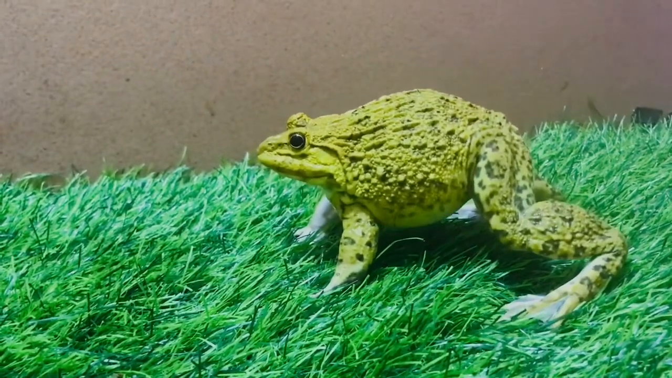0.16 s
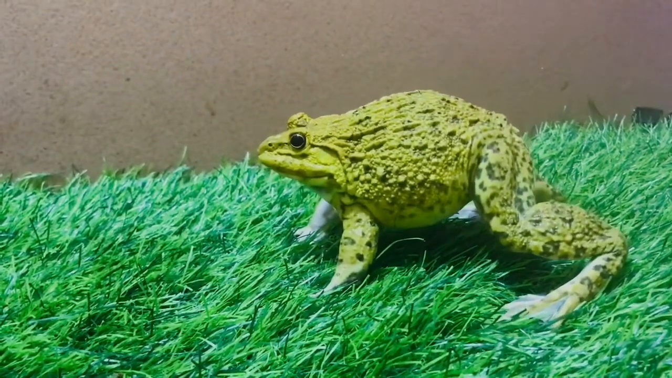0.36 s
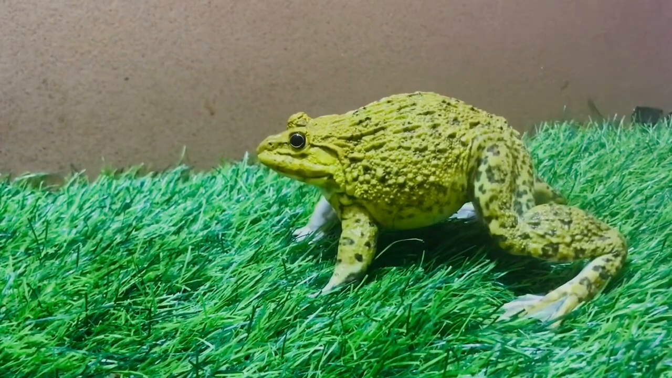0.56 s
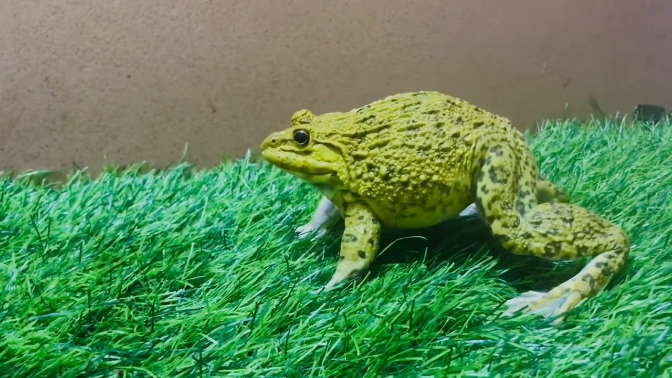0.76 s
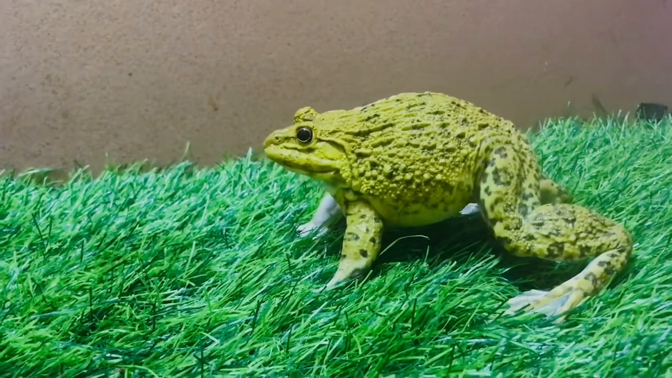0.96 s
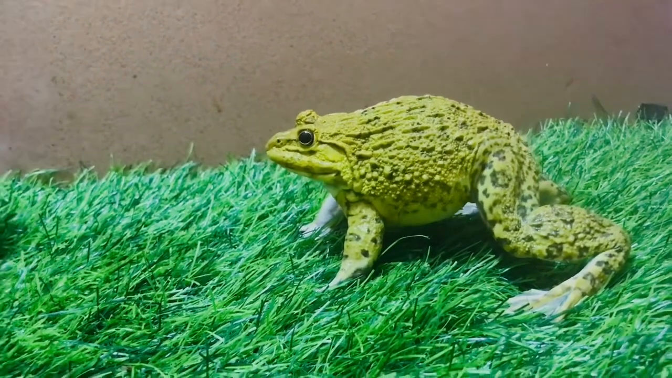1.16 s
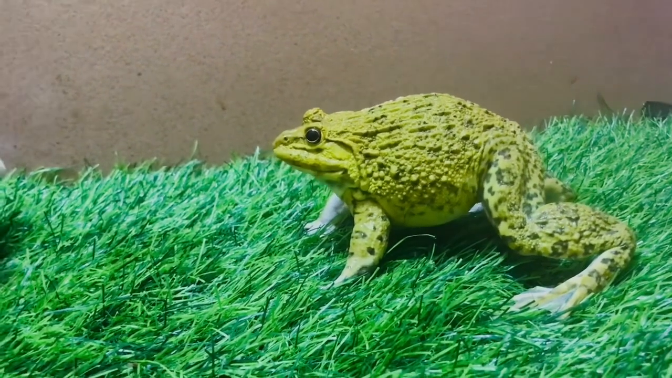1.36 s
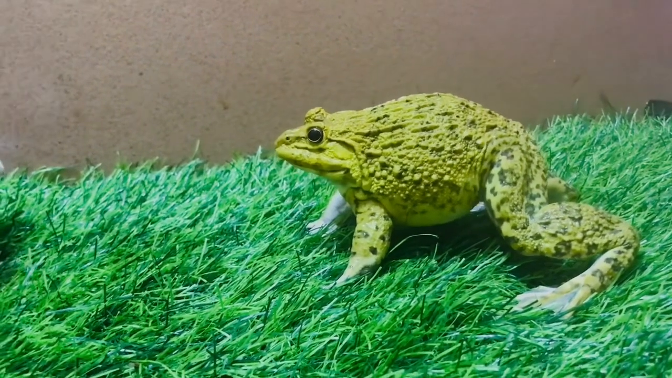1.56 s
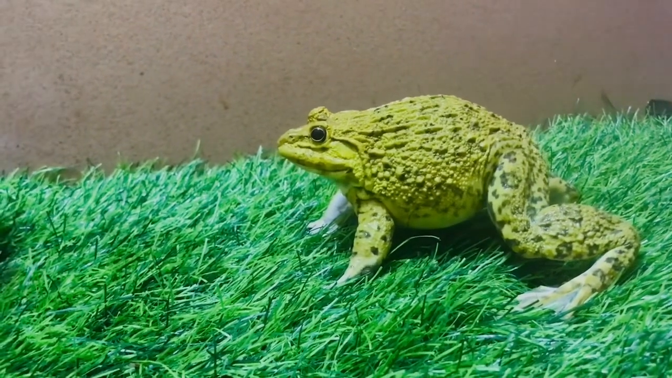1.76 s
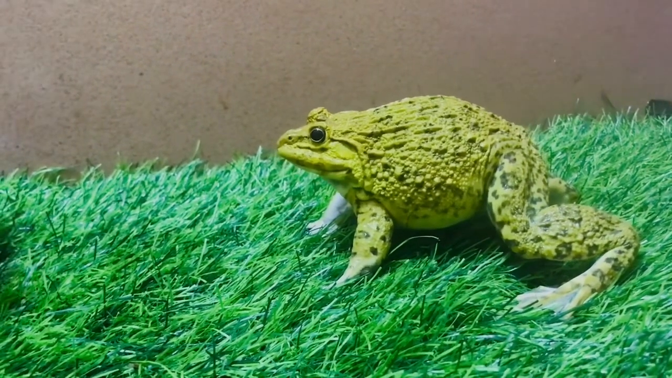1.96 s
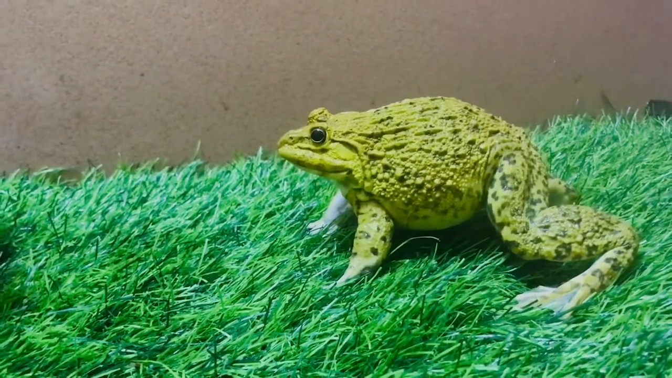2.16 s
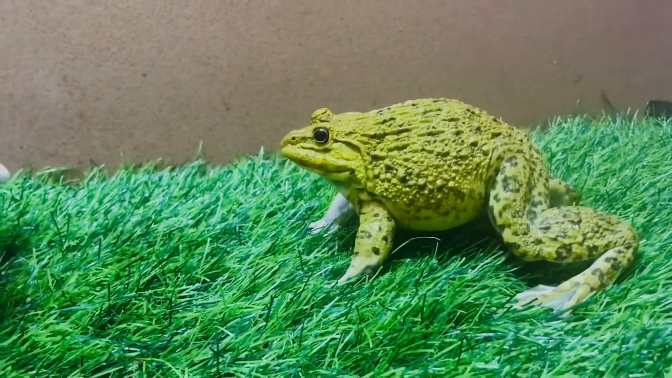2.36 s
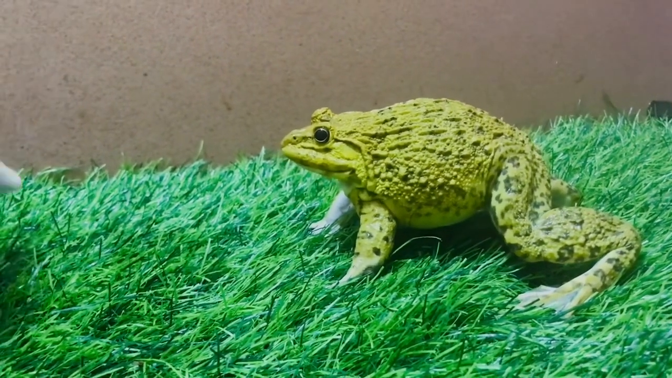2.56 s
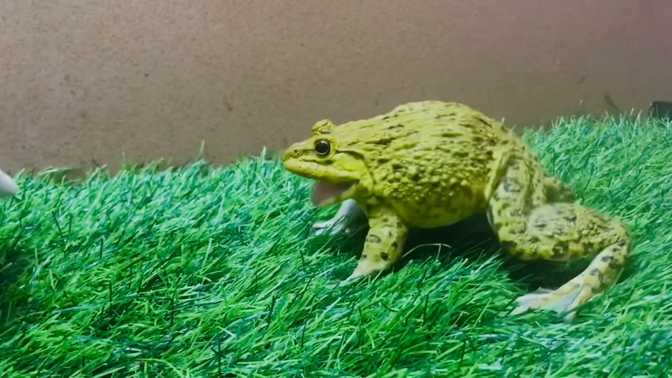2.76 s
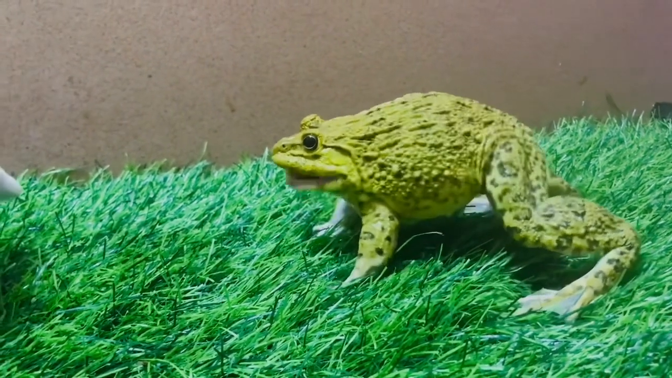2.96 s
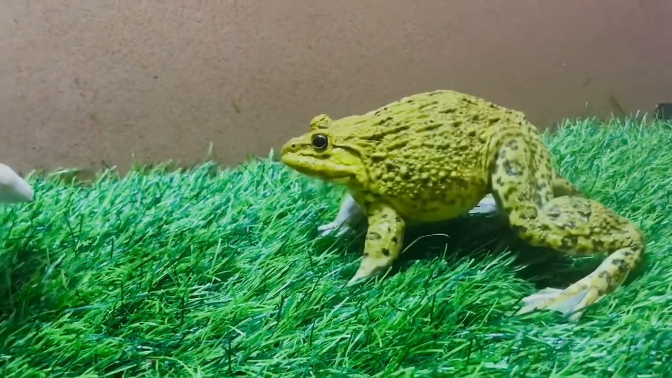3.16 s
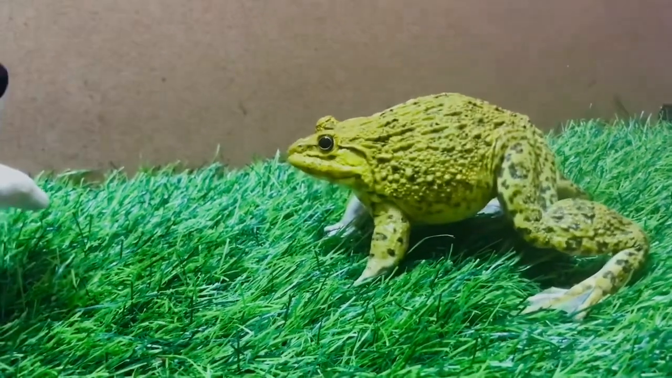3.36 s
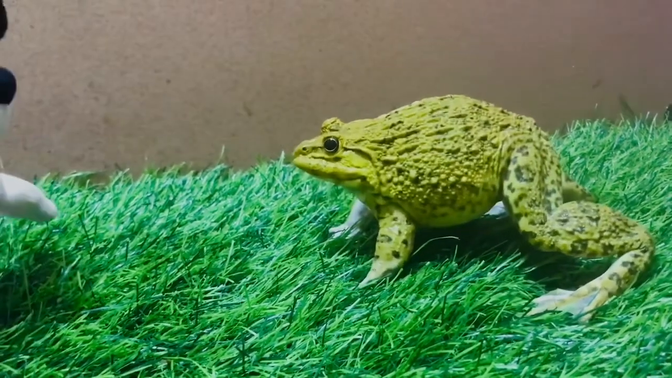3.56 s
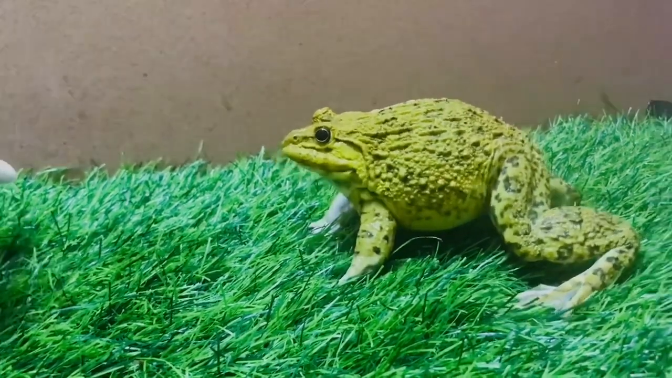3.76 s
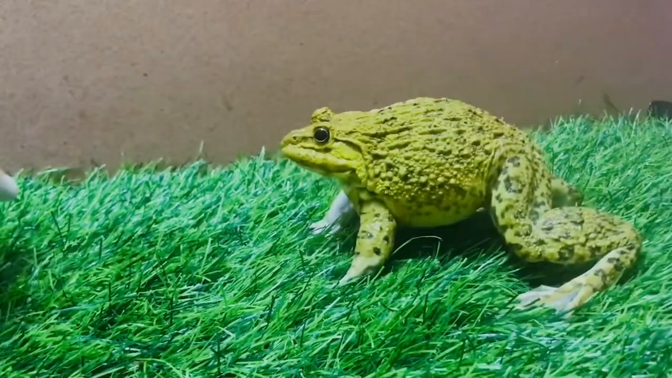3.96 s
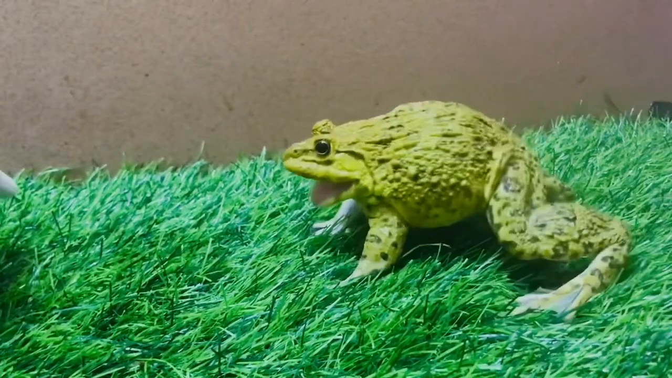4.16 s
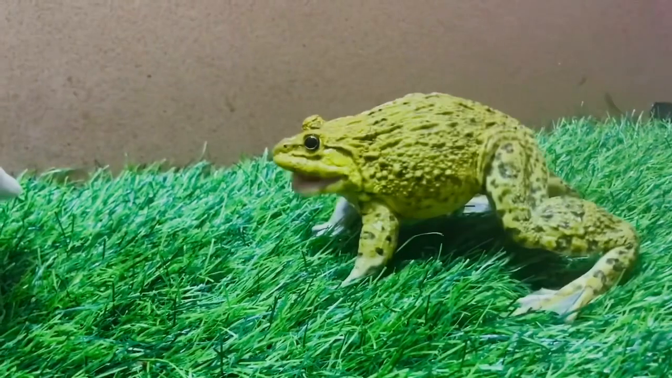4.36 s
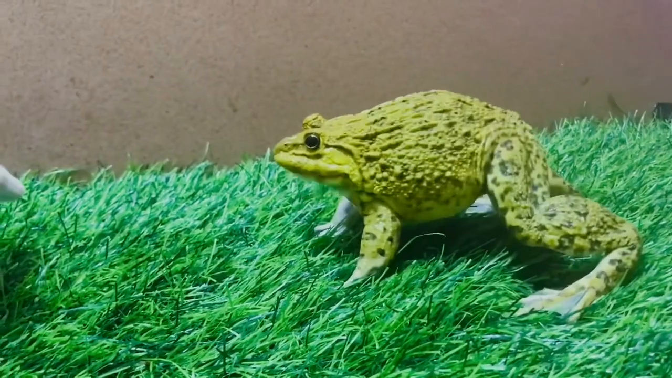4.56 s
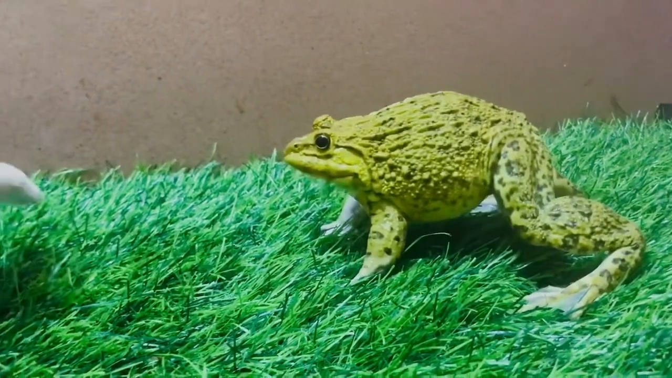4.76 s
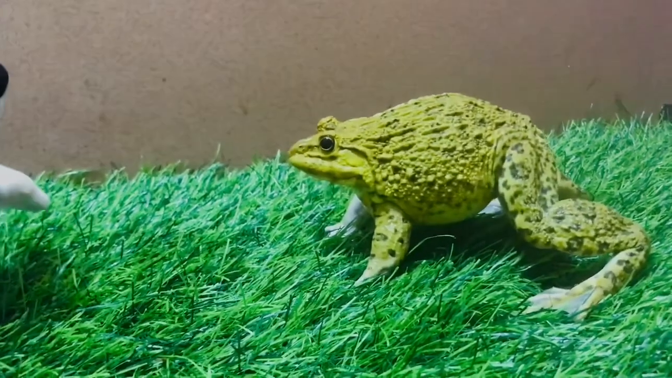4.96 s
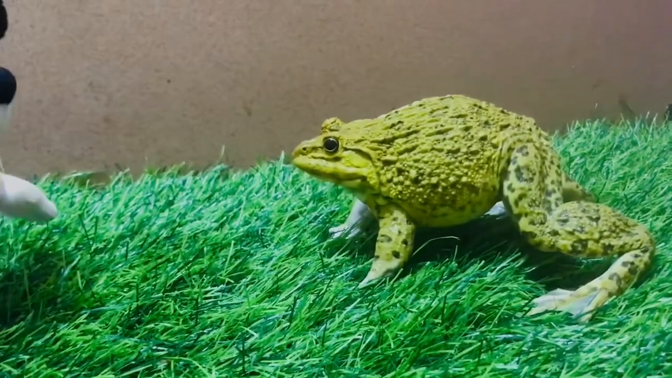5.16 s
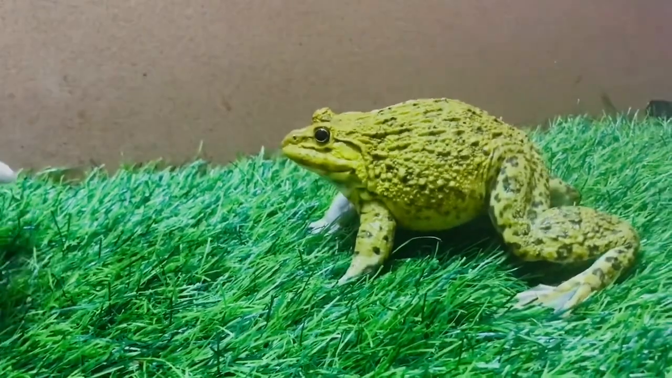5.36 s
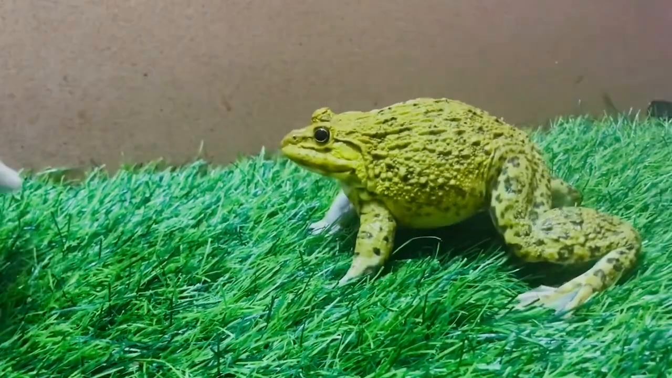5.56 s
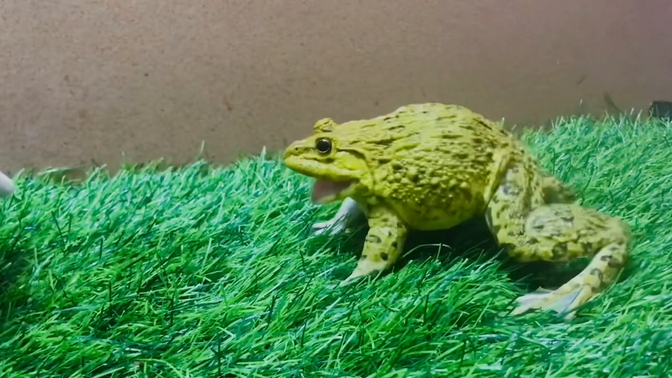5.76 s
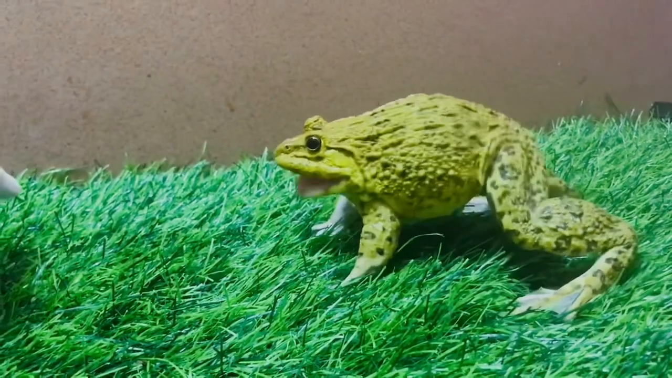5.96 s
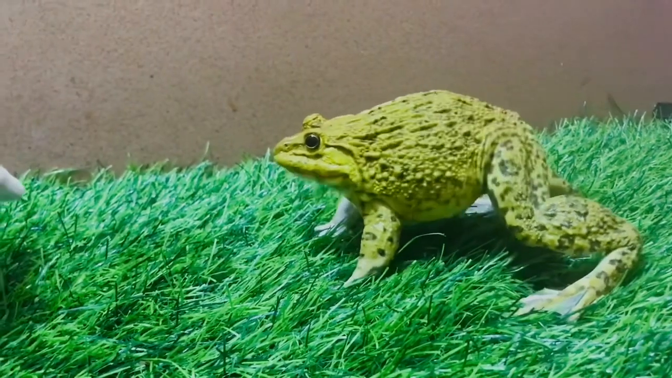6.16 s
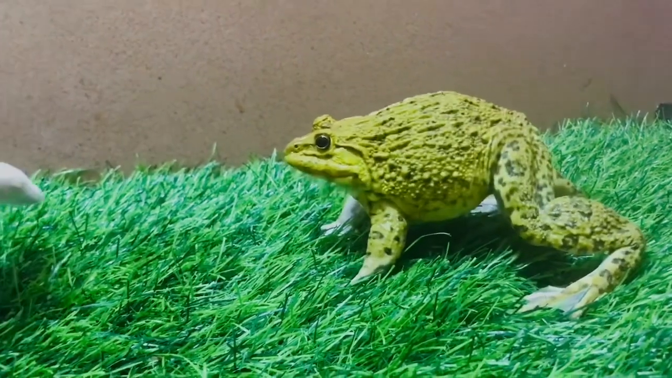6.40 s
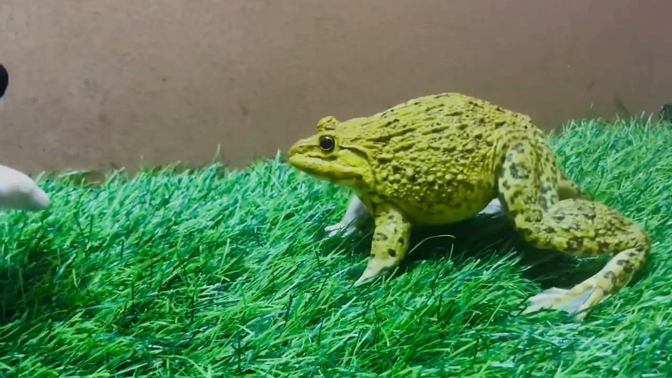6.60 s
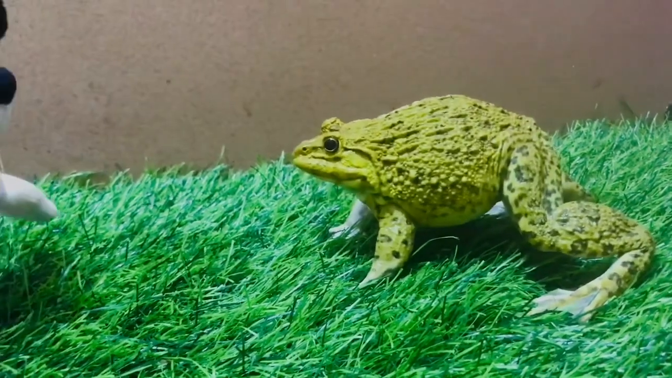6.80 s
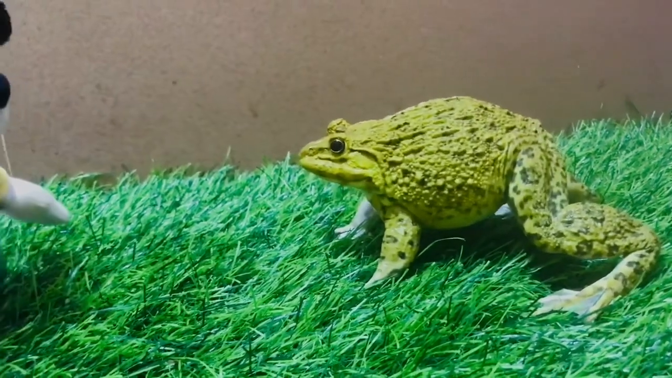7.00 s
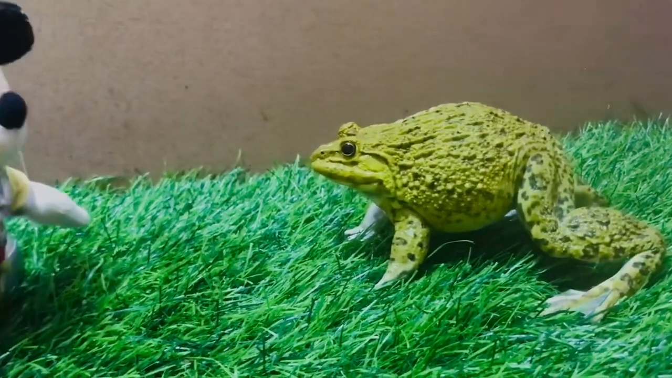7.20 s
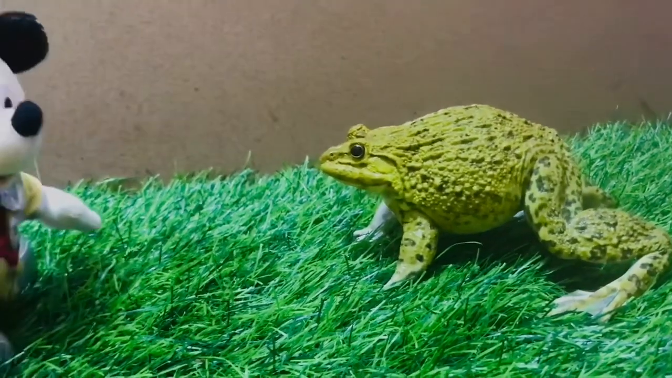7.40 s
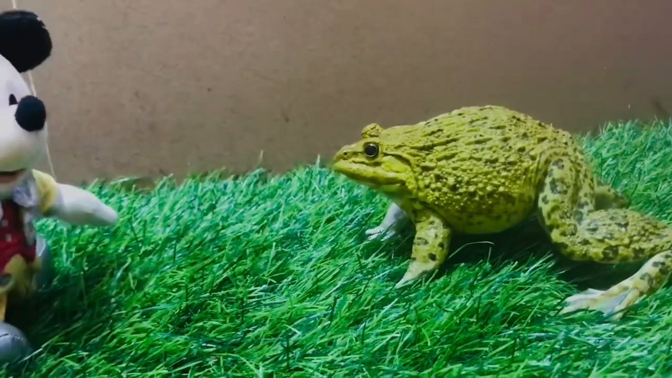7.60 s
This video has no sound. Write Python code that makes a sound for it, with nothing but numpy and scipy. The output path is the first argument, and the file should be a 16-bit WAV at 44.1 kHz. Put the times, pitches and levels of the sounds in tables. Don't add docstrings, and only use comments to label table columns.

```python
import sys
import numpy as np
from scipy import signal
from scipy.fft import rfft, irfft, next_fast_len
from scipy.io import wavfile
from scipy.ndimage import uniform_filter1d, map_coordinates

SR = 44100
rng = np.random.default_rng(int(sys.argv[2]) if len(sys.argv) > 2 else 0)


def store_pcm(level_fs):
    pcm = np.round(np.clip(level_fs, -1, 1) * 32767).astype(np.int16)
    wavfile.write(sys.argv[1], SR, np.atleast_2d(pcm).T)


def rack_gain(trim_db):
    fader = np.asarray(trim_db, float)
    return 10 ** (fader / 20)


N = 336744
SOURCE_TOP_HZ = 18700
VOICE_SPAN = slice(round(2.6 * SR), round(2.95 * SR))


def unit(x):
    return x / np.sqrt(np.mean(x ** 2) + 1e-20)


def in_time(rows):
    s, *columns = np.transpose(rows)
    return [np.interp(np.arange(N) / SR, s, c) for c in columns]


def at_hz(points, hz):
    point_hz, value = np.transpose(points)
    return np.interp(np.log(np.maximum(hz, 1)), np.log(point_hz), value)


def coloured(points):
    size = next_fast_len(N)
    gain = rack_gain(at_hz(points, np.fft.rfftfreq(size, 1 / SR)))
    noise = irfft(rfft(rng.standard_normal(size)) * gain, size)
    return unit(noise[:N])


def resonance(x, hz, width_hz):
    r = np.exp(-np.pi * width_hz / SR)
    poles = [1, -2 * r * np.cos(2 * np.pi * hz / SR), r * r]
    return signal.lfilter([(1 - r * r) / 2, 0, (r * r - 1) / 2], poles, x)


def narrow(hz, width_hz):
    once = resonance(rng.standard_normal(N), hz, width_hz)
    return unit(resonance(once, hz, width_hz))


def smooth_chance(shape, hz):
    low_pass = signal.butter(3, hz, fs=SR, output="sos")
    return unit(signal.sosfilt(low_pass, rng.standard_normal(shape)))


def swells(rows):
    t = np.arange(N) / SR
    return sum(rack_gain(db - 20 * np.maximum((s - t) / rise, (t - s) / fall)) for s, db, rise, fall in rows)


def add_ring(out, start_s, level_db, hz, t60_s):
    t = np.arange(round(.15 * SR)) / SR
    ring = rack_gain(level_db - 60 * t / t60_s) * np.sin(2 * np.pi * hz * t)
    piece = out[round(start_s * SR):][:len(t)]
    piece += ring[:len(piece)]


def patchy(x, depth_db):
    edges_hz = 31.25 * 2. ** np.arange(10)
    tops_hz = edges_hz[1:] * [1, 1, 1, 1, 1, 1, 1, 1, 1.25]
    slow = signal.butter(2, .04, output="sos")
    drift = unit(signal.sosfilt(slow, rng.standard_normal((9, N // 100 + 1))))
    drift = np.repeat(drift, 100, axis=1)
    drift = uniform_filter1d(drift[:, :N], size=200)
    bands = [signal.sosfilt(signal.butter(1, pair, "band", fs=SR, output="sos"), x)
             for pair in zip(edges_hz, tops_hz)]
    return unit(np.sum(bands * rack_gain(depth_db * drift), axis=0))


# hz, level_db_per_hz
FAN_SPECTRUM = [(20, -44.5), (32, -13.5), (45, -3), (80, -2.5), (120, -4.5), (140, -13.5), (200, -11.5),
                (280, -13), (330, -4.5), (375, -13), (550, -20.5), (800, -27), (1300, -31), (2500, -64.5)]
# hz, level_db_per_hz
HISS_SPECTRUM = [(600, -26.5), (950, -2.5), (1200, -10.5), (1600, -5.5), (2200, -6.5), (3500, -7),
                 (5000, -13), (7000, -7), (7900, -16), (9000, -10.5), (12000, -11), (18500, -15)]
# hz, width_hz, level_db
HUM_LINES = [(45, 5, -65.5), (67.6, 3.1, -62.5), (101.6, 7.4, -56), (298, 8, -73), (296, 10, -69.5),
             (338.6, 2.2, -63)]


def fan_and_hum():
    rumble = rack_gain(-54.5) * patchy(coloured(FAN_SPECTRUM), depth_db=2.2)
    hiss = rack_gain(-69) * patchy(coloured(HISS_SPECTRUM), depth_db=3.5)
    hum = sum(rack_gain(db) * narrow(hz, width_hz) for hz, width_hz, db in HUM_LINES)
    return rumble + hiss + hum


# hz, width_hz, level_db, throbs_per_s, throb_depth_db
CRICKET_BANDS = [(3990, 290, -73, 7.4, .5), (9030, 620, -76.5, 7.4, 1.5), (7200, 360, -85, 5, 1),
                 (1490, 160, -78.5, 1.5, 0.5)]
# peak_s, level_db, rise_s, fall_s
FAR_BOUTS = [
    (.3, -70, .13, 0.84),
    (1.27, -71, .17, .8),
    (2.2, -71, .2, 0.62),
    (7.42, -74, .13, .5),
]


def crickets():
    t = np.arange(N) / SR
    out = swells(FAR_BOUTS) * narrow(3000, 240)
    for hz, width_hz, db, throbs_per_s, depth_db in CRICKET_BANDS:
        throb_db = depth_db * np.sin(2 * np.pi * throbs_per_s * t + 1.2)
        out += rack_gain(db + throb_db) * narrow(hz, width_hz)
    return out


# peak_s, low_db, high_db, rise_s, fall_s
AIR_PUFFS = [
    (.79, -61, -66, .65, .37),
    (1.07, -53, -53.5, 0.11, 0.077),
    (1.28, -72, -88, .3, 0.16),
    (1.55, -64, -84, .2, .03),
    (1.66, -65.5, -75, 0.055, .3),
    (2.05, -60, -71, .18, 0.12),
    (2.6, -52.5, -61, 0.26, .047),
    (7.05, -64, -88, .035, .17),
    (7.202, -71, -82, 0.0096, 0.53),
]


def air():
    low = swells(np.delete(AIR_PUFFS, 2, axis=1))
    high = swells(np.delete(AIR_PUFFS, 1, axis=1))
    low_noise = coloured([(900, -27), (1500, -4), (3200, -1), (7000, -7.0), (9000, -11.5), (16000, -22.5)])
    high_noise = coloured([(7000, -26.0), (9500, -4), (11200, -1), (13000, -6.0), (18000, -15.5)])
    return low * rack_gain(-4) * low_noise + high * rack_gain(-2.5) * high_noise


# peak_s, level_db, rise_s, fall_s
TOY_SHIFTS = [
    (7.308, -54.5, 0.17, 0.083),
    (7.454, -71, .15, .03),
    (7.62, -78, .2, .1),
]
# start_s, peak_db, hz, cycles_to_60_db_down
BLADE_TICKS = [(.78, -56, 5000, 8), (1.1613, -44, 3200, 10), (1.162, -46, 6200, 16),
               (2.4733, -52, 3100, 12), (3.585, -52, 3000, 10), (3.5855, -55, 5500, 14),
               (7.405, -51, 3200, 16), (7.406, -57, 6000, 16), (7.6, -56, 10000, 20), (7.17, -57, 930, 90),
               (7.205, -60, 920, 60), (7.26, -45, 800, 10), (7.262, -63, 1750, 60), (7.308, -54, 1000, 40),
               (7.31, -57, 1800, 30), (7.351, -56, 940, 40), (7.39, -65, 1500, 120), (7.47, -64, 1500, 120)]
# start_s, peak_db, hz, t60_s
BODY_THUMPS = [
    (3.2852, -27, 100, .045),
]


def mat():
    out = swells(TOY_SHIFTS) * rack_gain(-1.0) * coloured(
        [(120, -21.5), (220, 9.0), (500, 0.5), (950, -1), (1400, -16.0), (2500, -31.0)])
    for start_s, peak_db, hz, cycles in BLADE_TICKS:
        add_ring(out, start_s, peak_db, hz, cycles / hz)
    for thump in BODY_THUMPS:
        add_ring(out, *thump)
    return out


# hz, t60_s
TAIL_T60 = [(400, 0.82), (1300, .75), (3500, 0.77), (8000, 0.69), (11000, 0.73), (15000, 0.25)]
# hz, level_db
TAIL_COLOUR = [(400, 9), (1500, -4), (3500, 3), (5500, -3), (8000, -6), (11000, 5.5), (15000, -6.5)]
# hz, level_db, t60_s
ROOM_MODES = [(4050, -62.5, 0.93), (4580, -61.5, .9), (3760, -65.5, 0.89), (880, -68, .9),
              (930, -68.5, 0.95)]


def room(x):
    late_db, early_db, early_t60_s = -20, -13.5, 0.19
    t = np.arange(round(1.1 * SR)) / SR
    edges_hz = 300 * 2 ** np.arange(0, 6.1, 1 / 4)
    onset = np.clip((t - .002) / 0.0022, 0, 1)
    tail = 0
    for low_hz, high_hz in zip(edges_hz, edges_hz[1:]):
        hz = np.sqrt(low_hz * high_hz)
        t60_s = at_hz(TAIL_T60, hz)
        band_pass = signal.butter(2, [low_hz, high_hz], "band", fs=SR, output="sos")
        band = signal.sosfilt(band_pass, rng.standard_normal(len(t)))
        late = rack_gain(late_db - 60 * t / t60_s) / np.sqrt(t60_s)
        early = rack_gain(early_db - 60 * t / early_t60_s) / np.sqrt(early_t60_s)
        tail = tail + band * rack_gain(at_hz(TAIL_COLOUR, hz)) * (late + early) * onset
    tail = tail * np.sqrt(6 * np.log(10) / SR)
    for hz, db, t60_s in ROOM_MODES:
        tail += rack_gain(db - 17.5 - 60 * t / t60_s) * np.sin(2 * np.pi * hz * t)
    return signal.fftconvolve(x, tail)[:N]


# time_s, pitch_hz, effort_db, bright_db_per_octave, top_db (over 9.5 kHz)
CRY = [
    (2.682, 1634, -3, 0, 2),
    (2.692, 1785, -4, 2.5, 1),
    (2.704, 1869, -6, 5.5, -5),
    (2.722, 1823, -6, 5, -8),
    (2.752, 1644, -5, 1.5, -3),
    (2.775, 1552, -5.5, -0.5, -1),
    (2.83, 1446, -14, 0.5, 1),
    (2.844, 1319, -15.5, -1, 1),
    (2.867, 1183, -20, -0.02, 4),
]


def folds():
    catch_s, catch_hz_per_s, catch_db_per_s = .012, 75000, 1199
    crack_at_s, crack_ratio, crack_dip_hz, crack_settle_s = 2.811, .925, 82.3, .005
    let_go_s, let_go_hz, let_go_db, let_go_bright_db = 0.013, 160.4, -5.5, 2.5
    shut_hz_per_s, shut_db_per_s, shut_bright_db = 60000, 2998, -11
    gape_db, gape_s = 11.5, .012
    t = (np.arange(N) / SR)[VOICE_SPAN]
    first_s, last_s = CRY[0][0], CRY[-1][0]
    pitch, effort_db, bright, top_db = [uniform_filter1d(c, size=200)[VOICE_SPAN] for c in in_time(CRY)]

    before, after = np.maximum(first_s - t, 0), np.maximum(t - last_s, 0)
    slack, shut = np.clip(after / 0.0046, 0, 1), np.maximum(after - let_go_s, 0)
    cracked = t - crack_at_s
    step = np.clip(cracked / 0.0033 + .5, 0, 1)
    unsettled = step * np.exp(-np.maximum(cracked, 0) / crack_settle_s)

    pitch = pitch * (1 - (1 - crack_ratio) * step) - crack_dip_hz * unsettled
    pitch = pitch - catch_hz_per_s * before - let_go_hz * slack - shut_hz_per_s * shut
    pitch = np.maximum(pitch, 400)
    effort_db = effort_db - catch_db_per_s * before - 100 * np.clip((before - catch_s) / 0.0025, 0, 1)
    effort_db += let_go_db * slack - shut_db_per_s * shut
    bright = bright + let_go_bright_db * slack + shut_bright_db * np.clip(shut / .004, 0, 1)
    top_db = top_db + gape_db * np.exp(-np.abs(t - last_s) / gape_s)
    caught = np.maximum(t - first_s + catch_s / 2, 0)
    breath = .03 + .4 * np.exp(-caught / .007) + .08 * step + 0.25 * slack
    return pitch, effort_db, bright, top_db, np.clip(breath, 0, 1)


def leak():
    from_s, peak_s, peak_db, rise_s, fall_s, hold_db = 2.646, 2.676, -27, .017, .014, -60
    t = np.arange(N) / SR
    puff = swells([(peak_s, peak_db, rise_s, fall_s)]) * np.clip((t - from_s) / .003, 0, 1)
    hold = np.clip(np.minimum(t - peak_s, CRY[-1][0] - t) / .015, 0, 1)
    return puff + rack_gain(hold_db) * hold


# hz, level_db
THROAT_SPECTRUM = [(450, -15.5), (1100, -3.5), (1600, -3.5), (2500, -2), (3200, -3.5), (4200, 2.5),
                   (5300, 0), (6200, -3.5), (7200, -1.5), (8700, -3), (9800, -17), (11500, -21),
                   (14500, -17.5), (17500, -30)]
# hz, width_hz, depth_db
ECHO_NOTCHES = [(2480, 70, 13), (3568, 63, 19), (6280, 120, 6.5), (7630, 170, 13), (9050, 88, 9),
                (10620, 170, 8), (12370, 250, 13.5), (13960, 170, 14), (15560, 140, 14), (17000, 250, 10.5)]
# start_s, peak_db, low_hz, high_hz, high_db (re peak)
FOLD_FLAPS = [
    (2.661, -38, 998, 6010, -8.5),
    (2.6639, -20, 1311, 11410, -3),
    (2.667, -15, 1884, 6625, 3.5),
    (2.648, -54.5, 3980, 6460, -5),
    (2.654, -50, 4300, 6474, -9),
    (2.6575, -45, 4800, 7000, -8.5),
    (2.6606, -39, 6283, 11000, 0.5),
    (2.666, -24.5, 10000, 13700, 0.5),
]


def scream():
    pitch, effort_db, bright, top_db, breath = folds()
    jitter = 1 + 0.033 * breath * smooth_chance(len(pitch), hz=270)
    phase = 2 * np.pi * np.cumsum(pitch * jitter) / SR
    order = np.arange(1, 25)[:, None]
    hz = order * pitch
    level_db = at_hz(THROAT_SPECTRUM, hz) + bright * np.log2(hz / 2000) + top_db * (hz > 9500)
    notch_db = sum(depth_db / (1 + ((hz - notch_hz) / width_hz) ** 2)
                   for notch_hz, width_hz, depth_db in ECHO_NOTCHES)
    blur = 3.5 * breath ** 1.6 * (order / 4) * smooth_chance(hz.shape, hz=350)
    tones = np.sin(order * phase + np.pi / 5 * order ** 2) * (1 + blur)
    tones = rack_gain(effort_db + level_db) * tones * (hz < SOURCE_TOP_HZ)

    noises = leak() * coloured([(300, -39)] + THROAT_SPECTRUM[1:] + [(19500, -60)])
    for start_s, peak_db, low_hz, high_hz, high_db in FOLD_FLAPS:
        add_ring(noises, start_s, peak_db, low_hz, .012)
        add_ring(noises, start_s, peak_db + high_db, high_hz, .006)

    direct, spread = noises.copy(), noises.copy()
    direct[VOICE_SPAN] += np.sum(tones * rack_gain(-notch_db), axis=0)
    spread[VOICE_SPAN] += np.sum(tones * rack_gain(-.3 * notch_db), axis=0)
    return direct, spread


def scene():
    background = fan_and_hum() + crickets()
    small_sounds = air() + mat()
    direct, spread = scream()
    return (direct + room(spread) + background + small_sounds)[None]


def replay(x):
    from_s, at_s, length_s, speed = 2.44575, 3.752, 49 / 30, .8
    t = np.arange(N) / SR
    since = t - at_s
    slow = (since >= 0) & (since < 2 * length_s)
    read_s = np.where(slow, from_s + speed * (since % length_s), t)
    fine = signal.resample_poly(x, 2, 1)
    fade = 1
    for join_s, depth in ((0, 1), (length_s, 1), (2 * length_s, .3)):
        past = since - join_s
        fade = fade * (1 - depth * np.clip(1 - np.maximum(-past / 0.035, past / 0.03), 0, 1))
    fade = fade * np.clip(np.abs(since - 2 * length_s) / .004, 0, 1)
    return fade * map_coordinates(fine, [read_s * 2 * SR], order=3)


def band_limit(x):
    return signal.sosfilt(signal.butter(12, 16470, fs=SR, output="sos"), x)


def record(dry):
    top, release_db_per_s = .93, 60.0
    power = uniform_filter1d(uniform_filter1d(dry[0] ** 2, size=400), size=400)
    over_db = np.maximum(10 * np.log10(power + 1e-12) + 24, 0)
    release_db = release_db_per_s * np.arange(N) / SR
    cut_db = 0.35 * (np.maximum.accumulate(over_db + release_db) - release_db)
    x = dry[0] * rack_gain(-uniform_filter1d(cut_db, size=400))
    x = x / (1 + (x / top) ** 10) ** (1 / 10)
    x = signal.sosfilt(signal.cheby2(12, 60, SOURCE_TOP_HZ + 200, fs=SR, output="sos"), x)
    x = signal.sosfilt(signal.cheby2(16, 40, 15830, fs=SR, output="sos"), replay(x))
    return band_limit(x[None])


dry = scene()
out = record(dry)
store_pcm(out)
```